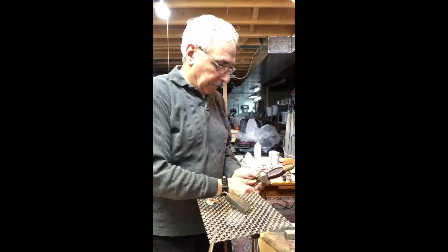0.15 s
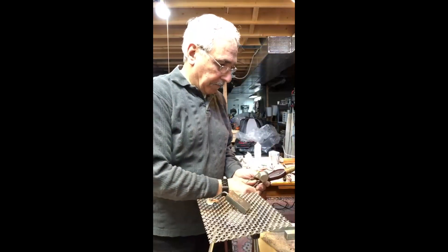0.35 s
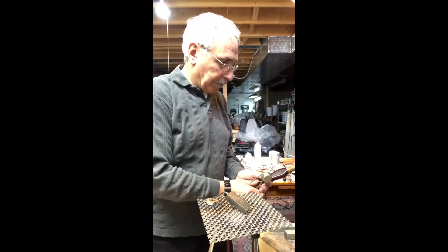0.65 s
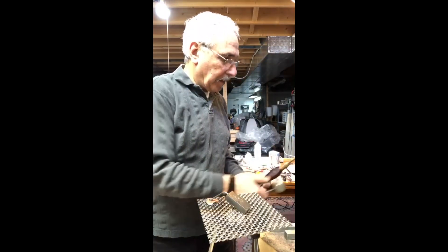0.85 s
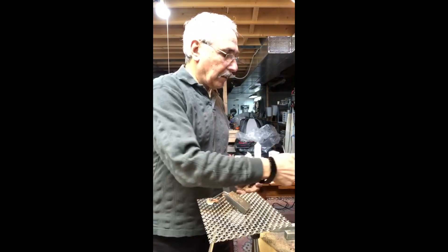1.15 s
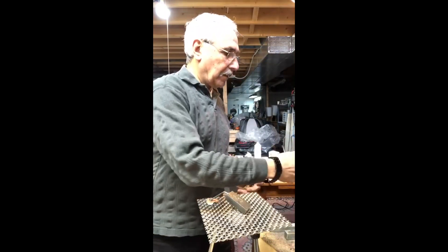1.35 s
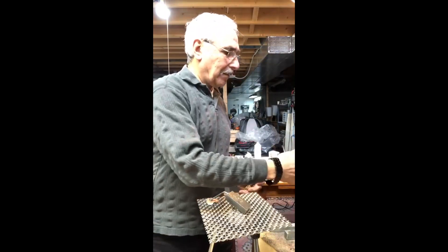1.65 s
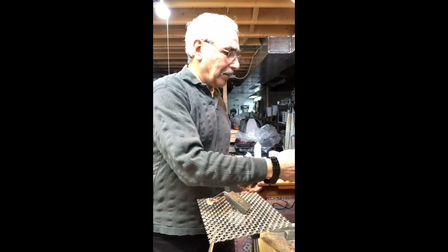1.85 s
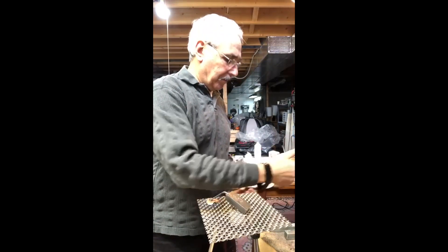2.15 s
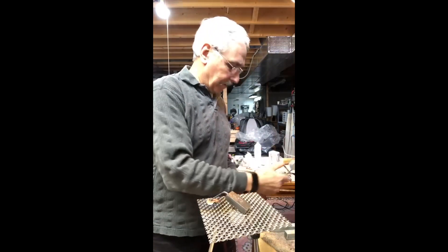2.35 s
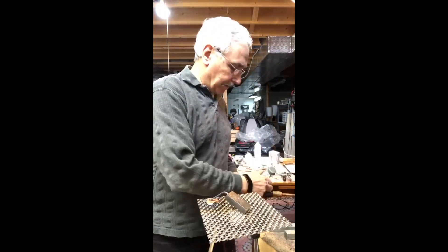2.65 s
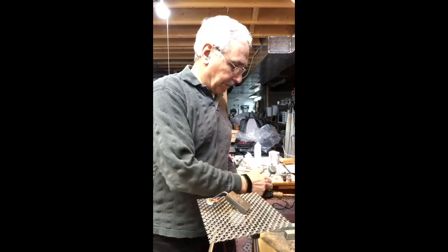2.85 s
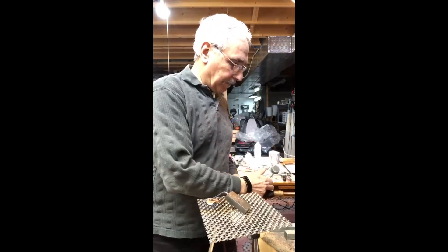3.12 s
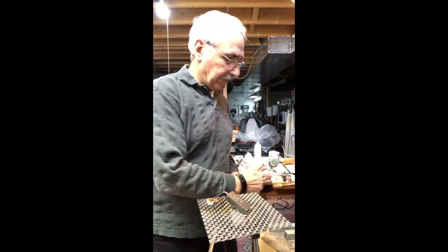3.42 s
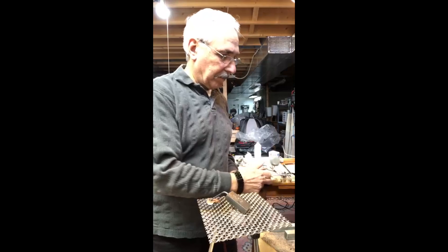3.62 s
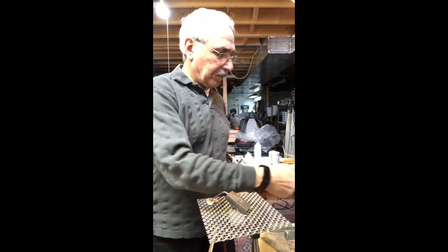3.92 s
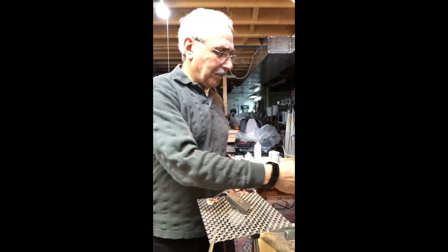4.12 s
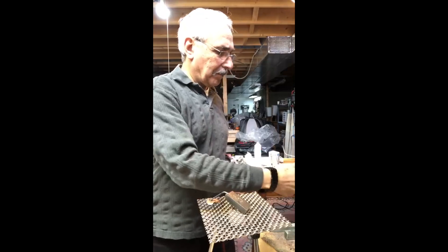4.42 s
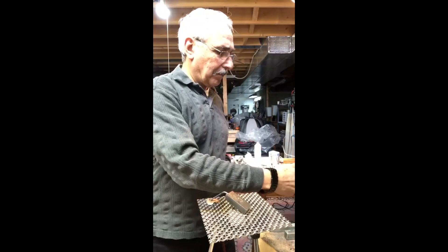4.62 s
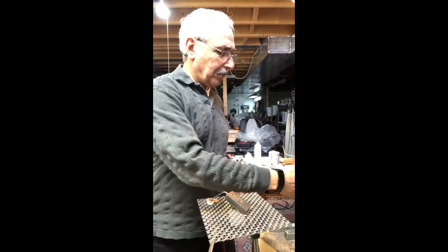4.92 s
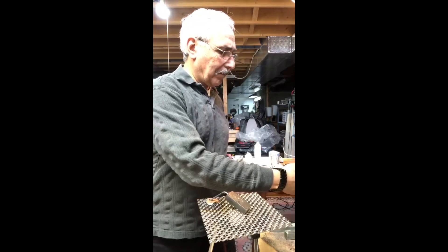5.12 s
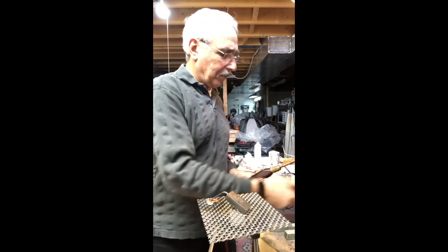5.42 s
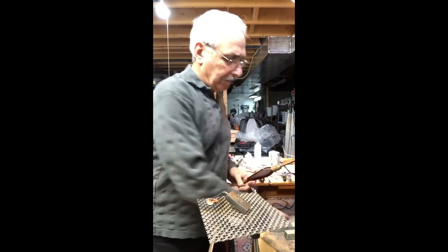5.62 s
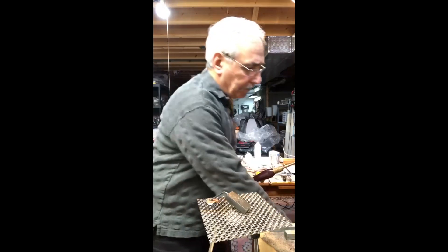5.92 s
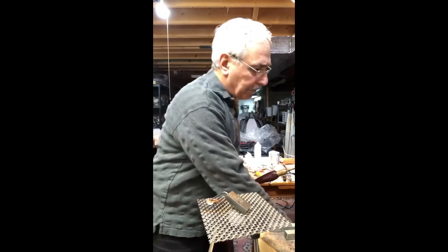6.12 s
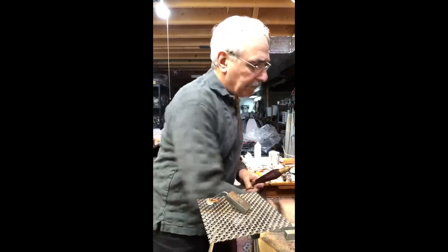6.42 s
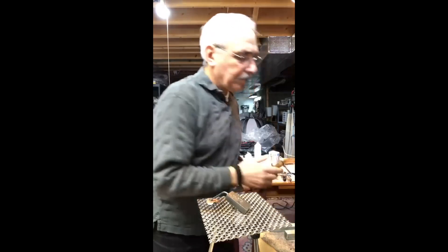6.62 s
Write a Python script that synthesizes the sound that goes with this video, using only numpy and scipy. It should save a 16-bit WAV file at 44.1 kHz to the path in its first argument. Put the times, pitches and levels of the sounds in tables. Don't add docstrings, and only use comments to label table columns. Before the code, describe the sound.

Close, dry metal ticks and ringing clinks come first, then a busy run of scratchy chattering squeezes over faint rumble. After a quieter gap with a soft cloth rustle, unlit gas hisses with a whistly tube tone. More strikes, then a loud pop booms in the small room. The burning torch roars, its tone shifting as it moves, with wooden knocks near the end.

```python
import sys
import numpy as np
from scipy import signal
from scipy.fft import rfft, irfft
from scipy.io import wavfile

SR = 44100
rng = np.random.default_rng(int(sys.argv[2]) if len(sys.argv) > 2 else 0)


def gain_from_db(level_db):
    decades = np.asarray(level_db, float) / 20
    return 10 ** decades


def int16_out(signal):
    q = np.round(np.clip(np.atleast_2d(signal).T, -1, 1) * 32767)
    wavfile.write(sys.argv[1], SR, q.astype(np.int16))


N = 298557
TIME = np.arange(N) / SR

# pitch_hz, level_db [dB per Hz]
RUMBLE_SPECTRUM = [(12, -40), (20, -1.5), (91, -5), (122, 3.5), (148, -8.5), (216, -1.5), (381, -33.5),
                   (473, -29), (729, -44), (834, -29), (1250, -40.5), (1360, -40.5), (1780, -41),
                   (8310, -38), (12000, -56), (12800, -59), (16600, -94), (22000, -120)]
# pitch_hz, width_hz, level_db
HUM = [(120.9, 4.5, -53), (202, 20, -61), (237.6, 15, -65), (77, 13, -57)]
# start_s, low_ring_db, free_pitch_hz [mode the grip leaves free], high_ring_db [re low ring]
FIDGETS = [(0.346, -57.5, 3200, 14), (0.6639, -41, 3980, 9), (0.7957, -23, 2320, -17),
           (0.839, -34, 4300, -12), (0.878, -48, 3630, 1), (0.8974, -48.5, 3650, 10.5),
           (1.1052, -16, 3750, -16), (2.6035, -42, 2580, -20), (2.6323, -30.5, 3750, -0.5),
           (2.7272, -33.5, 2560, -30), (2.7341, -57, 4300, -5), (2.7782, -50, 3660, -9.5),
           (1.064, -52, 3700, -6), (0.95, -55, 3760, -1)]
# [s, dB, Hz, dB]
SQUEEZES = [(1.3144, -37.5, 2820, -6), (1.3637, -25, 3050, -7.5), (1.3833, -24, 3450, -6.5),
            (1.4023, -23, 3750, 3), (1.4285, -20, 3050, 4), (1.549, -27.5, 3770, -13),
            (1.5634, -15.5, 3740, -7), (1.5695, -5, 3100, -1), (1.5802, -18, 3336, 6.5),
            (1.6614, -10.5, 3740, -10), (1.7035, -21.5, 2980, -1.5), (1.726, -24, 3600, -3.5),
            (1.742, -23.5, 2950, -1.5), (1.752, -16, 3740, 2.5), (1.8537, -33, 3690, -16.5),
            (1.8741, -19, 3450, -14), (1.9004, -13.5, 3500, -0.5), (1.9078, -12, 3390, -3),
            (1.9153, -19.5, 3285, 2.5), (1.9306, -13, 3010, 2.5), (1.9534, -31, 3320, 2.5)]
# [s, dB, Hz, dB]
STRIKES = [(3.6408, -24.5, 3670, -5.5), (3.7372, -29, 3770, -9), (3.9772, -22, 3050, -13),
           (3.9965, -26, 3140, -8), (4.0408, -18, 3440, 5), (4.096, -22, 3600, -9),
           (4.1582, -23.5, 3290, -5), (4.1848, -6.5, 3203, -1), (4.216, -29.5, 3240, 7.5),
           (4.2474, -24.5, 3280, -10), (5.008, -39, 3200, -6), (5.1444, -27.5, 3240, 8),
           (5.2687, -27, 3070, 7.5), (5.3037, -22.5, 4000, -10)]
# pitch_hz, level_db, t60_s
STEEL_MODES = [(2546, -15, 0.03), (3156, -10, 0.12), (3370, -13, 0.17), (3740, -5.5, 0.036), (4140, -7, 0.1),
               (5010, -18, 0.15), (5900, -11.5, 0.15), (6350, -10, .06), (5970, -8, 0.13),
              (6295, -2.5, 0.12), (7020, -20.5, 0.069), (7140, -10, .05), (7210, -22.5, 0.075),
              (10880, -16.5, 0.08)]
# pitch_hz, level_db [dB per Hz]
CRACK_SPECTRUM = [(290, -59), (500, -26.5), (1970, -22), (3770, 0), (4690, -18), (5910, 3.5), (8290, -29.5),
                  (12100, -23.5), (12800, -41), (16600, -78), (22000, -120)]
# start_s, length_s, level_db
SCRAPES = [(0.795, 0.066, -49), (1.09, .012, -49), (1.353, 0.091, -39.5), (1.56, 0.024, -21),
           (1.697, 0.05, -32.5), (1.86, 0.1, -41), (1.889, 0.057, -29.5), (2.635, 0.054, -54.5),
           (3.995, .045, -34.5), (4.18, 0.028, -23), (5.262, 0.022, -30)]
# pitch_hz, width_hz, level_db
FILE_RESONANCES = [(1055, 770, -18), (3190, 780, 0.5), (3750, 910, 0), (5300, 700, -7), (5900, 440, 1.5),
                   (7700, 510, -9.5), (10800, 3500, -16)]
# start_s, knock_db, pitch_hz, steel_db [re knock]
KNOCKS = [
    (1.129, -33, 445, -14),
    (5.89, -5, 1434, -11),
    (5.914, -14.5, 1423, -21),
    (6.193, -16, 1439, -16),
    (6.332, -9.5, 1454, -17),
    (6.382, -9.5, 1820, -17),
    (6.405, -13, 1936, -10),
    (6.423, -10, 1400, -35),
]
# pitch_hz, level_db [dB per Hz]
JET_SPECTRUM = [(290, -51), (500, -30.5), (837, -13), (2550, -19), (3430, -7.5), (4440, -9), (5020, -10),
                (11000, -11.5), (12800, -12), (16600, -56), (22000, -120)]
# pitch_hz, width_hz, level_db [over the jet]
TUBE_RESONANCES = [(818, 55, 8), (1835, 29, 17), (2824, 30, 12), (3530, 200, 4), (4000, 110, -0.5),
                   (5090, 92, 15), (5900, 170, 12), (6660, 63, 6.5), (7750, 180, 7.5), (8940, 230, -1.5),
                   (9630, 180, 2.5)]
# pitch_hz, level_db [dB per Hz]
BOOM_SPECTRUM = [(24, -43), (40, -25), (158, 1.5), (263, -1.5), (343, 0.5), (480, -2), (742, -17.5),
                 (1770, -27.5), (4430, -27.5), (5910, -28), (6510, -31.5), (11900, -43), (12800, -53),
                 (16600, -83), (22000, -120)]
# pitch_hz, t60_s
BOOM_T60 = [(60, 0.8), (130, 0.23), (400, 0.28), (1000, 0.42), (4000, 0.38), (12000, 0.28)]
# pitch_hz, level_db [dB per Hz]
ROAR_SPECTRUM = [(35, -64), (60, -19.5), (96, -26.5), (361, -9.5), (662, -11), (1080, -1.5), (1740, -5),
                 (2080, -8.5), (2910, -9), (3330, -9.5), (3810, -13), (5460, -15), (11200, -28.5),
                 (12800, -36), (16600, -78), (22000, -120)]
# time_s, echo_delay_ms, echo_share [0-1]
CARRY = [
    (5.2, .86, 0.57),
    (5.55, 0.976, 0.23),
    (5.9, 0.864, 0.24),
    (6.4, .93, 0.05),
    (6.47, 1.05, 0.23),
    (6.62, 1.11, 0.5),
    (6.77, 1.29, 0.66),
]

POP_S = 5.0942
SLEEVE_S = 2.2


def rms_one(x):
    return x / np.sqrt(np.mean(x ** 2) + 1e-20)


def in_time(rows):
    s, *columns = np.transpose(rows)
    return [np.interp(TIME, s, column) for column in columns]


def at_hz(points, hz):
    table_hz, value = np.transpose(points)
    return np.interp(np.log(hz), np.log(table_hz), value)


def drift(rate_hz):
    r = np.exp(-80 * np.pi * rate_hz / SR)
    white = rng.standard_normal(N // 40 + 2002)
    slow = signal.lfilter([1], [1, -2 * r, r * r], white)[2000:]
    return np.interp(np.arange(N) / 40, np.arange(len(slow)), rms_one(slow - slow.mean()))


def ring(x, hz, t60_s):
    r, w = gain_from_db(-60 / (t60_s * SR)), 2 * np.pi * hz / SR
    return signal.lfilter([0, np.sin(w)], [1, -2 * r * np.cos(w), r * r], x + 1e-18)


def peak(x, hz, width_hz):
    r = np.exp(-np.pi * width_hz / SR)
    feedback = [1, -2 * r * np.cos(2 * np.pi * hz / SR), r * r]
    return signal.lfilter(np.array([1, 0, -1]) * (1 - r * r) / 2, feedback, x)


def bands(sources, gain_at):
    edges = 18 * 2 ** np.arange(0, 9.7, 1 / 3)
    out = 0
    for k, (low, high) in enumerate(zip(edges, edges[1:])):
        band = signal.butter(2, [low, high], "band", fs=SR, output="sos")
        out = out + gain_at(np.sqrt(low * high)) * signal.sosfilt(band, sources[k % len(sources)])
    return out


def coloured(x, spectrum):
    hz = np.fft.rfftfreq(len(x), 1 / SR) + 1
    return irfft(rfft(x) * gain_from_db(at_hz(spectrum, hz)), len(x))


def bursts(times, length_ms, grit_db):
    t = np.arange(1800) / SR
    grit = rng.standard_normal((len(times), 2, len(t)))
    shape = t / length_ms * 1e3
    rows = grit[:, 0] * gain_from_db(grit_db * grit[:, 1]) * np.sqrt(shape) * np.exp(-shape)
    rows = rows / np.sqrt(np.sum(rows ** 2, axis=1, keepdims=True))
    starts = np.round(np.array(times) * SR).astype(int)
    return rows, np.minimum(starts[:, None] + np.arange(len(t)), N - 1)


def lay(rows, at, gains):
    return np.bincount(at.ravel(), (rows * gains[:, None]).ravel(), N)


def workshop():
    rumble = rms_one(coloured(rng.standard_normal(N), RUMBLE_SPECTRUM))
    out = gain_from_db(-51 + 0.8 * drift(2)) * rumble
    white = rng.standard_normal(N)
    for hz, width_hz, level_db in HUM:
        out = out + gain_from_db(level_db) * rms_one(peak(white, hz, width_hz))
    return out


def steel_rings(contacts, rows, at):
    spring_hz = 6120
    held_t60, free_t60 = 0.14, 0.55
    _, low_db, free_hz, high_db = np.transpose(contacts)[:, :, None]
    hz, mode_db, t60 = np.transpose(STEEL_MODES)
    luck = rng.standard_normal((len(contacts), 2, len(hz)))
    near = np.exp(-((free_hz - hz) / 200) ** 2)
    off_spring = np.abs(hz - spring_hz)
    spring = off_spring == off_spring.min()
    hz = np.where(spring, spring_hz, hz)
    free = np.maximum(near, spring)
    favour_db = np.where(hz < 4500, 14.3 * near - 6, high_db + 2.5 - free)
    level_db = low_db + mode_db + 2.9 * luck[:, 0] + favour_db
    hz = hz * (1 + 0.02 * luck[:, 1] * (1 - free)) + 0.9 * near * (free_hz - hz)
    t60 = t60 * (held_t60 + (free_t60 - held_t60) * np.maximum(0.53 * near, spring))
    t = np.arange(4000) / SR
    rings = 0
    for k in range(hz.shape[1]):
        decay = gain_from_db(level_db[:, k, None] - 60 * t / t60[:, k, None])
        rings = rings + decay * np.sin(2 * np.pi * hz[:, k, None] * t)
    rings = signal.fftconvolve(rows, rings, axes=1)
    ring_at = np.minimum(at[:, :1] + np.arange(rings.shape[1]), N - 1)
    return lay(rings, ring_at, np.ones(len(contacts)))


def lighter():
    contacts = FIDGETS + SQUEEZES + STRIKES
    s, low_db, _, high_db = np.transpose(contacts)
    rows, at = bursts(s, 2.23, grit_db=5)
    out = steel_rings(contacts, rows, at)
    crack_db = low_db + high_db + 13.5
    crack = lay(rows, at, gain_from_db(crack_db - 7.5))
    out = out + bands([crack], lambda hz: gain_from_db(at_hz(CRACK_SPECTRUM, hz)))
    loose = np.arange(len(s)) < len(FIDGETS)
    out = out + lay(*bursts(s, 0.97, grit_db=-0.5), gain_from_db(crack_db - 3 + 8.5 * loose))
    thud = peak(lay(rows, at, gain_from_db(crack_db - 18.5)), 600, 900)
    high_pass = signal.butter(4, 2180, "high", fs=SR, output="sos")
    return signal.sosfilt(high_pass, out) + thud


def scrape():
    teeth_per_s, rise_s, fall_s = 2200, 0.0053, 0.0069
    stroke = 0
    for s, length_s, level_db in SCRAPES:
        rise = (TIME - s) / rise_s
        fall = (s + length_s - TIME) / fall_s + 1
        stroke = stroke + gain_from_db(level_db) * np.clip(np.minimum(rise, fall), 0, 1)
    catch_db = 3.2 * np.minimum(rng.exponential(1, N), 4)
    catches = (rng.random(N) < teeth_per_s / SR) * gain_from_db(catch_db) * rng.standard_normal(N)
    steel = 0
    for k, (hz, width_hz, level_db) in enumerate(FILE_RESONANCES):
        broad = peak(peak(catches, hz, width_hz), hz, 3 * width_hz)
        steel = steel + (-1) ** k * gain_from_db(level_db) * broad
    return stroke * gain_from_db(drift(60)) * rms_one(steel)


def bench():
    out = np.zeros(N)
    rows, at = bursts([knock[0] for knock in KNOCKS], 3.0, grit_db=5.5)
    for k, (_, knock_db, hz, steel_db) in enumerate(KNOCKS):
        blow = lay(rows[k:k + 1], at[k:k + 1], gain_from_db([knock_db]))
        out += 0.75 * ring(blow, hz, 0.039)
        out += 0.48 * ring(blow, 1.45 * hz, 0.014)
        out += 0.42 * ring(blow, 2.3 * hz, 0.0048)
        out += gain_from_db(steel_db) * ring(blow, 6150, 0.055)
        out += 3.8 * peak(blow, 1.6 * hz, 1.77 * hz)
    return signal.sosfilt(signal.butter(2, 250, "high", fs=SR, output="sos"), out)


def room(x):
    t60_s, level_db = 0.28, -8.5
    t = np.arange(SR // 2) / SR
    tail = rng.standard_normal(len(t)) * gain_from_db(-60 * t / t60_s) * (1 - np.exp(-(t / 0.006) ** 2))
    dull = signal.lfilter([0.4], [1, -0.6], tail)
    tail = dull + (tail - dull) * gain_from_db(-40 * t / t60_s)
    return gain_from_db(level_db) * signal.fftconvolve(x, tail / np.sqrt(np.sum(tail ** 2)))[:N]


def echoes(x):
    turn = TIME / 0.05
    out = 0
    for k in range(4):
        share = np.clip(1 - np.abs((turn - k + 2) % 4 - 2), 0, 1)
        out = out + room(x * share)
    return out


def sleeve():
    hz, width_hz = 2496, 2800
    cloth = peak(peak(rng.standard_normal(N), hz, width_hz), hz, 2 * width_hz)
    brush = np.exp(-((TIME - SLEEVE_S) / 0.35) ** 2)
    return gain_from_db(-58 + 2.9 * drift(14)) * brush * rms_one(cloth)


def gas_flow():
    valve_s, opens_s, gas_db, seep_db = 3.157, 0.28, -39, -87.5
    surge_s, surge_height_db, burnt_db_per_s = 5.1, 8, 130
    opened = 1 - np.exp(-(np.clip(TIME - valve_s, 0, 9) / opens_s) ** 2.4)
    surge_db = surge_height_db * np.clip((TIME - surge_s) / 0.1 + 0.5, 0, 1)
    seep = gain_from_db(seep_db) * np.clip(TIME - SLEEVE_S, 0, 1)
    burnt = gain_from_db(-burnt_db_per_s * np.clip(TIME - POP_S, 0, 9))
    return (seep + opened * gain_from_db(gas_db + surge_db)) * burnt


def gas():
    jet = coloured(rng.standard_normal(N), JET_SPECTRUM)
    tube = jet
    for hz, width_hz, level_db in TUBE_RESONANCES:
        tube = tube + gain_from_db(level_db) * peak(jet, hz, width_hz)
    for _ in range(2):
        tube = tube - 0.93 * peak(tube, 8330, 350)
    return gas_flow() * gain_from_db(drift(5.8)) * rms_one(tube)


def pop():
    t = TIME - POP_S
    after = np.clip(t, 0, 1)
    tube_noise = rms_one(peak(peak(rng.standard_normal(N), 580, 480), 690, 900))
    howl = np.cos(2 * np.pi * (1000 * t + 9000 * t ** 2)) + 0.6 * tube_noise
    swell = 0.16 * np.exp(np.clip(t, -1, 0) / 0.0056) * (t < 0) * howl

    snap_s = 0.0015
    spit = rms_one(peak(rng.standard_normal(N), 3000, 4500))
    burst = 2 * after / snap_s * np.exp(-(after / snap_s) ** 2) + 0.12 * np.exp(-after / 0.0036)
    snap = gain_from_db(-10.5) * spit * (t > 0) * burst

    turns = 150 * after + 1.1 * (1 - np.exp(-after / 0.004)) + 1.9 * (1 - np.exp(-after / 0.00068))
    sweep_shape = 1.2 * (1 - np.exp(-after / 0.00054)) * np.exp(-(after / 0.0077) ** 1.46)
    sweep = sweep_shape * np.sin(2 * np.pi * turns)

    late = np.clip(t - 0.008, 0, 9)

    def boom_gain(hz):
        rise_s = 0.0083 + 0.0055 * np.log2(1 + hz / 500)
        decay = gain_from_db(at_hz(BOOM_SPECTRUM, hz) - 60 * late / at_hz(BOOM_T60, hz))
        return decay * (1 - np.exp(-(late / rise_s) ** 2))

    boom = gain_from_db(14) * bands(rng.standard_normal((2, N)), boom_gain)
    room_mode = gain_from_db(-25 - 60 * late) * np.sin(2 * np.pi * 70 * late)
    return swell + snap + sweep + boom + room_mode


def flame():
    catch_s, rise_s = 5.12, 0.14
    delay_ms, share = in_time(CARRY)
    lit = np.clip(TIME - catch_s, 0, 9)
    roar_db = -22.5 - 8 * np.exp(-lit / 0.23) - 7 * np.clip(delay_ms - 1, 0, 1)
    bright_db = -2.5 + 8.5 * np.exp(-lit / 0.036) - 6.5 * np.clip(delay_ms - 0.95, 0, 0.15)
    together, flutter = drift(2.9), drift(29)

    def roar_gain(hz):
        flicker_db = 0.33 * together + 1.06 * flutter + 0.75 * drift(20)
        return gain_from_db(at_hz(ROAR_SPECTRUM, hz) + bright_db * np.log2(hz / 1000) / 2 + flicker_db)

    roar = bands(rng.standard_normal((2, N)), roar_gain)
    echo = np.interp(TIME - delay_ms / 1e3, TIME, roar)
    catch = 1 - np.exp(-(lit / rise_s) ** 2)
    return gain_from_db(roar_db) * catch * rms_one(roar + share * echo)


def scene():
    hits = lighter() + scrape() + bench()
    gain = gain_from_db(-9 * np.clip((TIME - 4.624) / 0.0032, 0, 1))
    steady = gain * (gas() + sleeve() + workshop())
    return (hits + echoes(hits) + pop() + flame() + steady)[None]


def band_limit(x):
    return signal.sosfilt(signal.butter(12, 13380, fs=SR, output="sos"), x)


def record(dry):
    lifted = dry + 0.54 * peak(dry, 12000, 840)
    cut = signal.sosfilt(signal.butter(2, 32, "high", fs=SR, output="sos"), lifted)
    cut = signal.sosfilt(signal.cheby2(12, 60, 13070, fs=SR, output="sos"), cut)
    mix = cut / (1 + cut ** 6) ** (1 / 6)
    return band_limit(mix)


dry = scene()
out = record(dry)
int16_out(out)
```